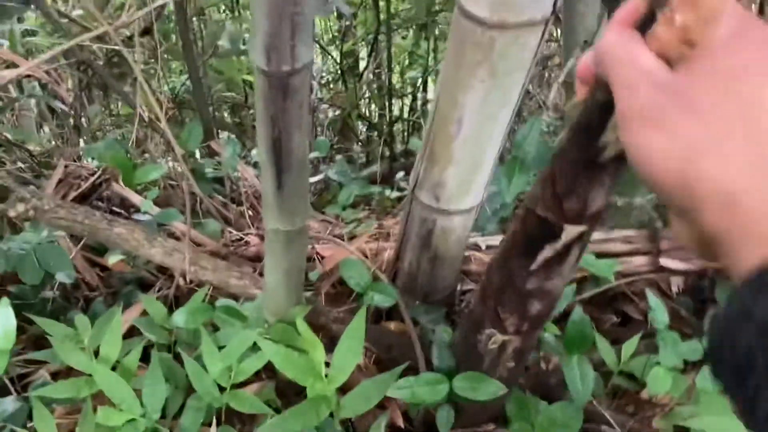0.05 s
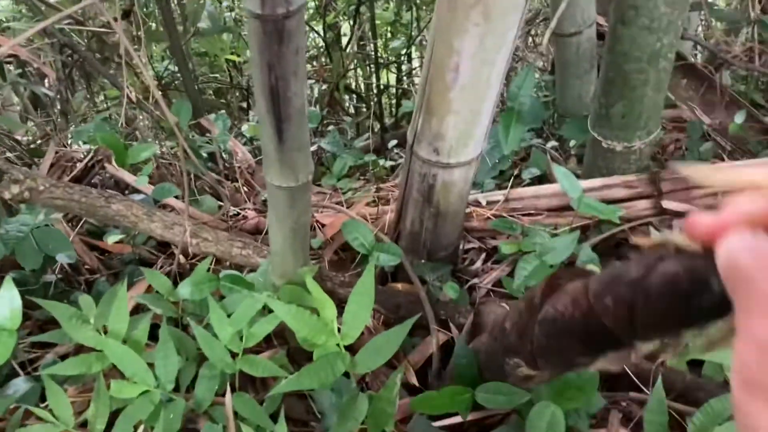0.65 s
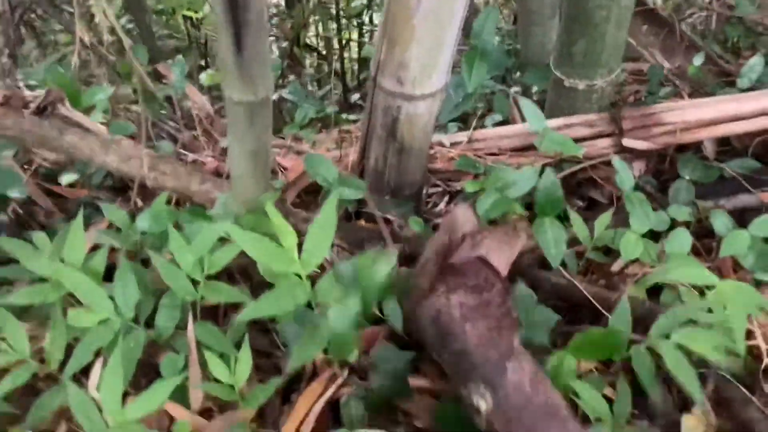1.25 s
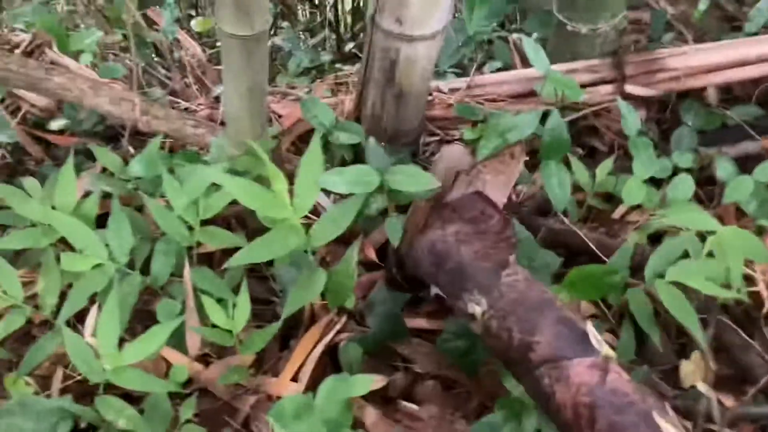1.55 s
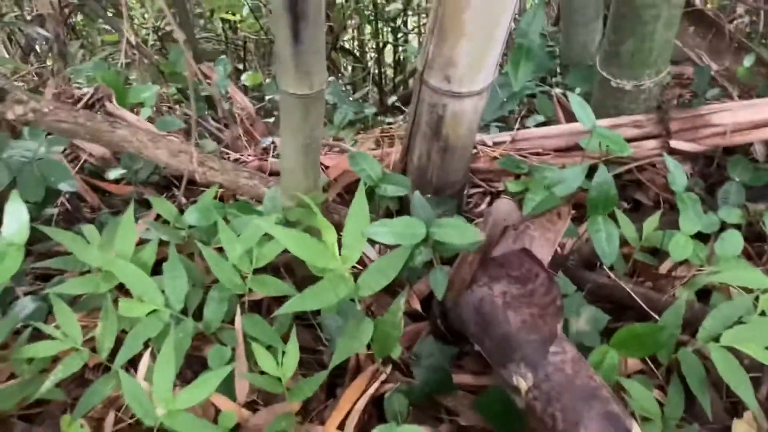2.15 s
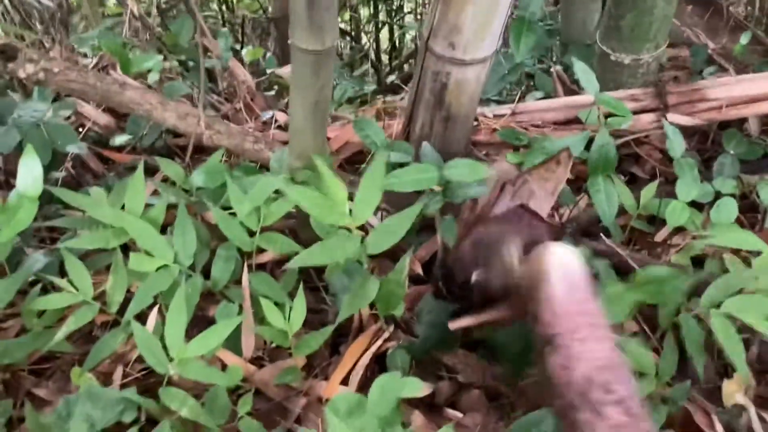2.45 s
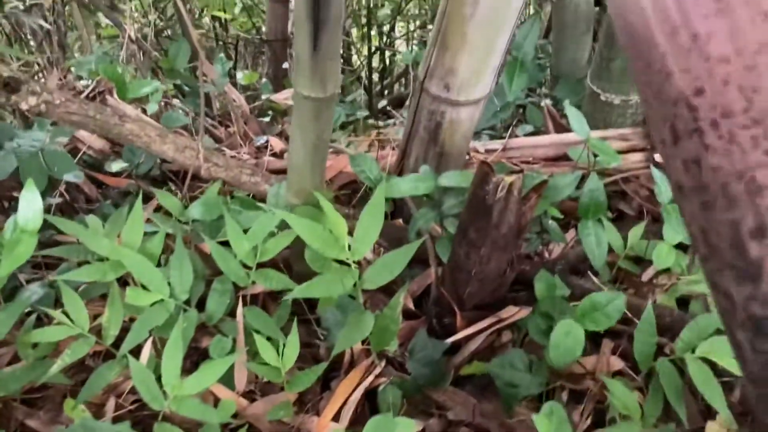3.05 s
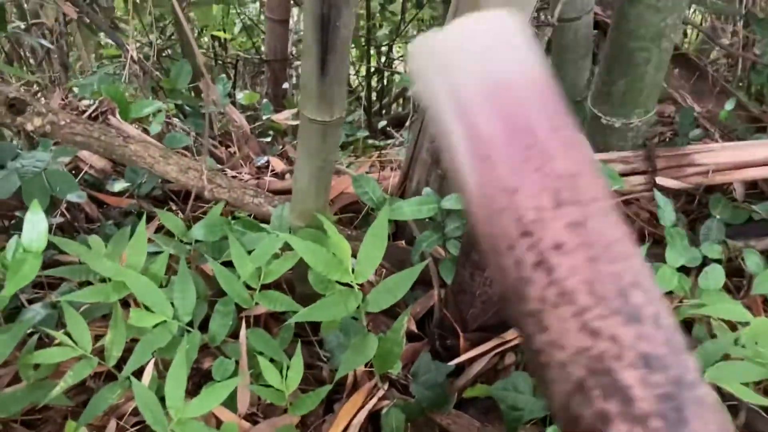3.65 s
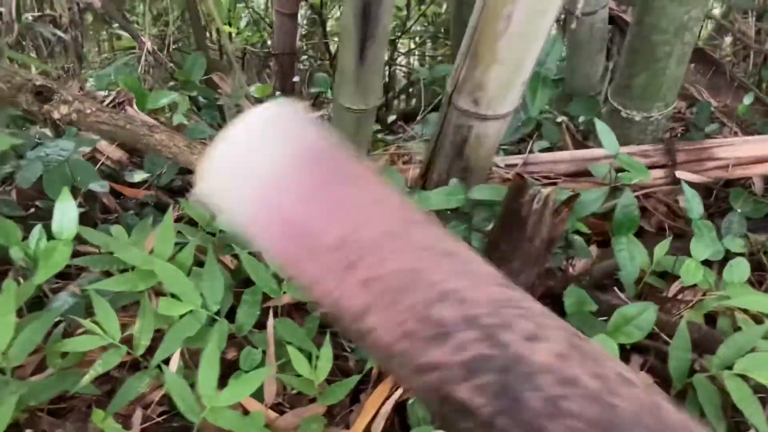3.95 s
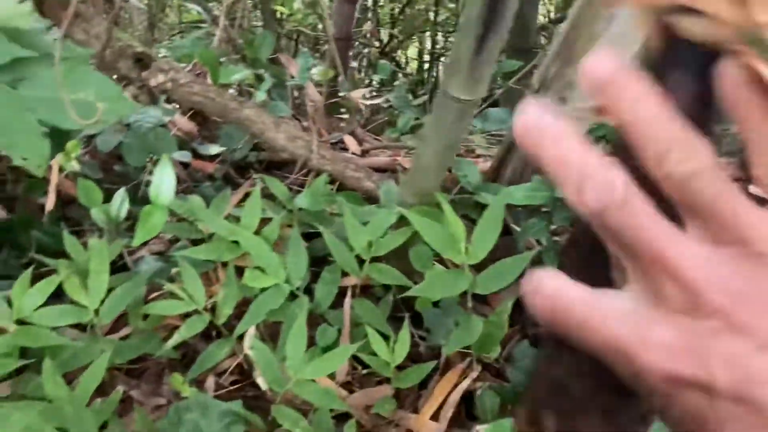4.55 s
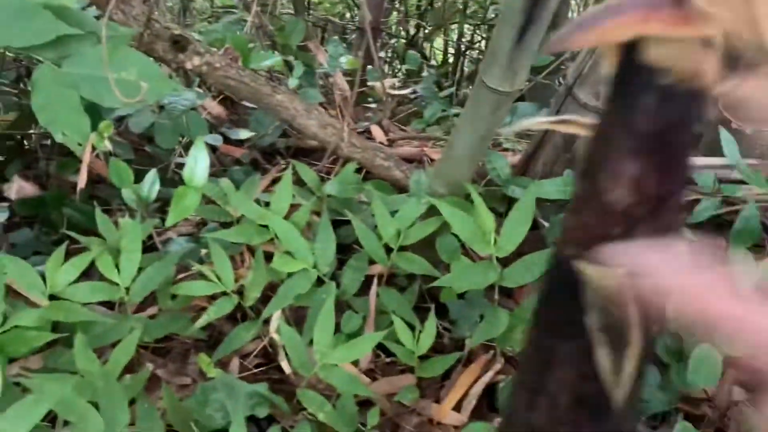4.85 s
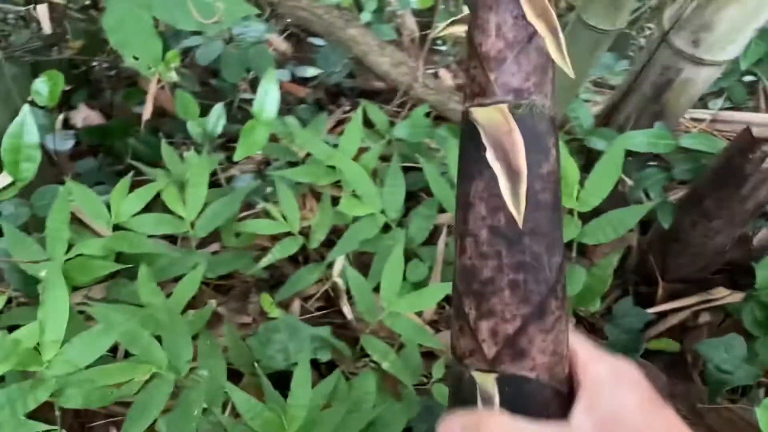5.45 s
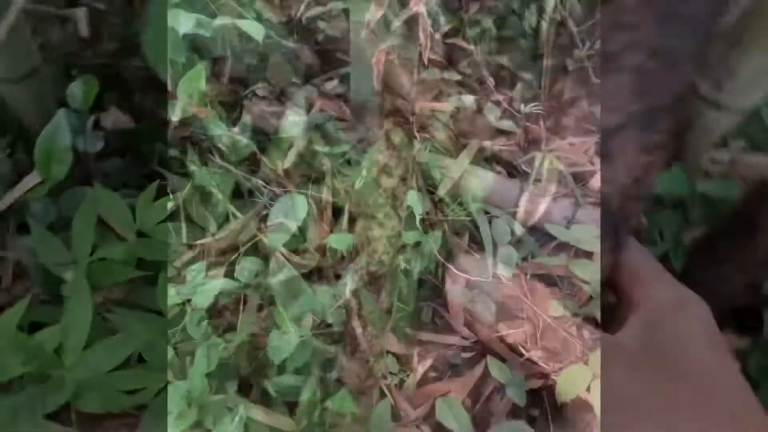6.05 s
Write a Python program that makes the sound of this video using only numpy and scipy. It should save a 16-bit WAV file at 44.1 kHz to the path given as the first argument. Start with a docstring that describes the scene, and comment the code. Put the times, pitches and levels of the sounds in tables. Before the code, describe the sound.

Close to the microphone in a quiet grove, a bamboo shoot is bent over by hand. Its fibres give way in an uneven run of sharp cracks with a few dull thuds. Leaves rustle, then the wet core tears out with a short squeaky rip. Softer brushing and small dry ticks follow as the shoot passes through leaves and hands slide over its husk. Faint foliage hiss and distant traffic lie behind.

```python
"""A bamboo shoot is bent over by hand, close to a stereo microphone in a quiet grove.
Its fibres crack one bundle after another and the rooted stump jolts the soil. The wet core twists,
then tears out of its husk with a stick-slip squeal. The shoot is drawn through low leaves and turned
in the hands, palm and sleeve sliding on the husk. Ground and stems scatter the cracks and the tear;
far traffic hums behind a faint hiss of foliage."""
import sys
import numpy as np
from scipy import signal
from scipy.fft import rfft, irfft, next_fast_len
from scipy.io import wavfile
from scipy.ndimage import uniform_filter1d

SR = 44100
rng = np.random.default_rng(int(sys.argv[2]) if len(sys.argv) > 2 else 0)


def generate_wav(sig):
    """Save sig (samples, or channels by samples) to the path in sys.argv[1] as 16-bit PCM at SR."""
    pcm = np.round(np.clip(np.atleast_2d(sig).T, -1, 1) * 32767).astype(np.int16)
    wavfile.write(sys.argv[1], SR, pcm)


N = 278271
TIME = np.arange(N) / SR
FRAME, HOP = 256, 64  # samples
FRAME_HZ = np.fft.rfftfreq(FRAME, 1 / SR)
FRAME_S = np.arange(-(-N // HOP) + 1) * HOP / SR

# Levels in the tables are relative: colour, grove and microphone act on them afterwards.
# far foliage: frequency_hz, gain_db
FOLIAGE_COLOUR = [(60, 2.5), (400, 4.5), (800, 2), (1500, -2), (4000, -10), (8000, -6.5), (16000, -11.5)]
# far traffic rumble: frequency_hz, gain_db
RUMBLE_COLOUR = [(15, -38.5), (25, 1), (91, 1.5), (184, -1.5), (249, -5), (358, -7.5), (448, -22),
                 (487, -8), (568, -31.5), (700, -26), (910, -47.5), (1540, -120)]
# swell of that rumble: time_s, level_db
RUMBLE_LEVEL = [(0.0, -54), (.9, -57.5), (1.8, -51), (2.35, -62), (3.2, -55), (4.4, -55.5), (5.0, -53.5),
                (6.0, -54)]
# far engine and tyres: time_s, pitch_hz, level_db
ENGINE_HUM = [(3.7, 93.1, -70), (4.05, 96.5, -58), (4.5, 98, -64), (4.85, 106.4, -63), (5.15, 102.2, -56.5),
              (5.4, 101.8, -73), (6.0, 100.6, -78)]
TYRE_WHINE = [(2.8, 496, -83), (3.2, 497, -73), (4.2, 492, -79), (5.3, 483, -75), (5.7, 483, -70),
              (6.0, 497, -67), (6.15, 502, -75), (6.3, 503, -80)]

# swells of hiss, mostly the shoot brushing leaves or fingers; the one at 0.26 s is a short swell of hiss just
# before a loud crack: peak_s, swell_s, fade_s, level_db, tilt_db_per_octave
BRUSH_STROKES = [(.1, 0.19, 0.09, -52, -4.5), (.26, .025, 0.011, -46.5, -5.5), (.86, 0.36, 0.25, -42.5, -3),
                 (1.156, 0.12, .04, -36, -1.2), (1.37, 0.13, 0.027, -39.5, 0.1),
                 (1.46, 0.077, 0.036, -34, 0.7), (1.57, 0.11, 0.077, -35.5, 1),
                 (1.76, 0.14, 0.14, -36.5, 1.5), (1.95, 0.12, 0.088, -41, 1.5),
                 (2.08, 0.11, 0.23, -38, 0.7), (2.455, 0.064, 0.083, -39.5, -4),
                 (2.565, .02, 0.097, -47, -5), (2.74, 0.044, 0.05, -50.5, -1),
                 (2.83, 0.12, .12, -43.5, -1.5), (3.349, 0.083, 0.076, -35, 3),
                 (3.63, 0.086, 0.086, -59.5, 1.5), (4.045, 0.14, 0.24, -47.5, 3),
                 (4.36, 0.081, 0.11, -37.5, 1.8), (4.51, .04, 0.18, -50.5, -0.5),
                 (4.746, 0.024, .019, -41.5, 3), (4.804, .036, 0.011, -39, 4.5),
                 (5.05, 0.065, 0.032, -42.5, -0.5), (5.14, .04, 0.032, -50.5, 0),
                 (5.43, 0.18, 0.064, -45, 2), (5.873, 0.2, 0.075, -50.5, 0.5), (6.027, .022, 0.042, -54, 5)]
# that brushing: frequency_hz, gain_db
BRUSH_COLOUR = [(25, -20.5), (70, 4), (250, -3), (700, -8), (1500, -3.5), (3000, 0.5), (5000, 0), (7500, 2),
                (10500, 2.5), (13000, -6), (16000, -10.5)]
# palm, sleeve and twisting core sliding on the husk: time_s, level_db
PALM_LEVEL = [(5.21, -74), (5.25, -42.5), (5.29, -41), (5.34, -43), (5.44, -46), (5.513, -51), (5.528, -78)]
SLEEVE_LEVEL = [(4.24, -86), (4.33, -56), (4.39, -44), (4.45, -57), (4.53, -81)]
TWIST_LEVEL = [(1.88, -56), (2.0, -51.5), (2.09, -45), (2.125, -52)]
# the husk's resonance under each of them: frequency_hz, gain_db
PALM_RESONANCE = [(100, -22), (1200, -7), (1700, -6), (2200, 0.5), (2700, -6.5), (3300, -10), (4300, -2.5),
                  (6000, -4.5), (16000, -13)]
SLEEVE_RESONANCE = [(100, -32), (600, -9), (1100, 0), (1500, -8), (2200, -11), (4000, -12), (16000, -42)]
TWIST_RESONANCE = [(100, -43), (1300, -19.5), (2000, 0), (2800, -0.5), (3800, -4.5), (8000, -28)]
# the stump jolts the soil, or the shoot is knocked: start_s, pitch_hz, level_db, decay_s
THUDS = [(0.27, 199.7, -14.5, 0.0024), (0.744, 171.4, -16, 0.0052), (1.061, 589.5, -10, 0.0032),
         (1.063, 90, -19.5, 0.013), (1.067, 250, -17, .007), (1.149, 131, -39.5, 0.0088),
         (1.486, 89, -37, 0.0098), (4.967, 516, -35, 0.0038), (4.967, 215, -36.5, 0.0081)]
# the wet core tearing: frequency_hz, gain_db
RIP_COLOUR = [(40, -26.5), (200, -6), (550, 0.5), (1000, -8), (1700, -3.5), (3000, -5), (5500, 1),
              (7500, 1.5), (10500, 1), (13000, -11), (16000, -14.5)]
# its squeaks: start_s, length_s, first_hz, last_hz, level_db, second_harmonic_db, third_harmonic_db
CORE_SQUEAKS = [(2.148, 0.017, 3164, 3210, -14, -17.5, -21.5),
                (2.166, 0.0088, 3650, 3720, -14.5, -4, -23.5),
                (2.172, 0.008, 5000, 5350, -17.5, -19.5, -28.5), (2.175, 0.0077, 3620, 3390, -27, 5.5, -10),
                (2.184, 0.0087, 3505, 3740, -11.5, -6, -10.5),
                (2.191, 0.014, 4196, 4610, -13.5, -13.5, -26.5),
                (2.199, 0.013, 4660, 4960, -17.5, -11, -27.5), (2.204, 0.0069, 1650, 2050, -24, -13, -15),
                (2.208, .017, 2426, 2610, -31.5, -10.5, 12), (2.225, .022, 2532, 2825, -29.5, -11, 5.5),
                (2.246, 0.0092, 4830, 4640, -31, -16, -26), (2.251, 0.014, 5500, 5900, -32, -8.5, -26)]
# a dry leaf or a flap of husk flicks, or the shoot is knocked in the hands: start_s, length_s, level_db,
# tilt_db_per_octave
DRY_TICKS = [(0.228, 0.0058, -41.5, -0.5), (0.529, 0.003, -42.5, -2.5), (0.655, 0.0023, -49, 6),
             (0.927, 0.016, -37.5, -1), (1.453, 0.0016, -39.5, 7), (1.485, 0.0024, -26.5, -4.5),
             (1.697, 0.003, -35.5, 2.9), (1.729, 0.0015, -40.5, 8), (1.765, 0.0066, -31, 6.5),
             (2.018, 0.0085, -42, 8), (2.07, 0.0051, -34.5, 0.5), (2.087, 0.004, -35.5, 1.5),
             (2.432, 0.0044, -27.5, -2.5), (2.448, 0.015, -23, -2.2), (2.456, 0.0073, -25.5, -2.5),
             (2.556, 0.007, -37, -5.5), (2.825, 0.0028, -42, 1), (3.562, 0.0074, -43, 3),
             (4.207, 0.0086, -46, 5), (4.327, 0.006, -43, 6.5), (4.571, 0.005, -40.5, 0.2),
             (4.689, 0.005, -40.5, -0.7), (4.743, 0.0039, -41, 3), (4.801, 0.0073, -42, 8.5),
             (4.966, 0.0096, -29.5, -0.1), (4.993, 0.004, -40, -4), (5.026, 0.0026, -43, -8),
             (5.152, 0.0036, -47.5, 1.5), (5.576, 0.0027, -48, 2.5)]
# a fibre bundle gives way: start_s, length_s, ring_hz, level_db, depth_octaves, tilt_db_per_octave
FIBRE_CRACKS = [(0.041, 0.0019, 2980, -8, 0.2, -7.5), (0.071, 0.0035, 2490.0, -33.5, 2.8, -3.5),
                (0.0907, 0.0042, 1020, -35.5, 4.2, -5), (0.2662, 0.0038, 2530, -8.5, 10, 0.15),
                (0.3117, 0.0036, 2630.0, -26, 0.66, 0), (0.3795, 0.0023, 1540, -8.5, 1.85, -7.5),
                (0.452, 0.0029, 4640, -19, 1.4, 1), (0.505, 0.0029, 2720, -28, 1.3, 0.8),
                (0.5636, 0.0072, 6650.0, -21.5, 1.23, -0.8), (0.6673, 0.0017, 2590.0, -24.5, 1.7, 1.5),
                (0.6735, 0.0051, 2697, -17, 2.4, 2.1), (0.6815, 0.0015, 2696, -18, 2.5, -5.6),
                (0.7111, 0.0032, 3700.0, -18.5, 3, -1.3), (0.7188, 0.0075, 4100, -22.5, 2.4, -2),
                (0.736, 0.0038, 6940.0, -16.5, 1.9, -1.0), (0.7385, 0.0028, 7000, -21, 2.5, 2.1),
                (0.743, 0.0026, 1368, -3, 2.07, -4.5), (0.766, 0.0023, 1240.0, -14, 3.3, -3.5),
                (0.7802, 0.0037, 6940.0, -19, 2.3, -5.5), (0.791, 0.004, 800.0, -15.5, 6, -2),
                (0.8243, 0.003, 1264, -17, 1.7, 0), (0.8351, 0.0034, 1200, -21.5, 1.8, 0.4),
                (0.8386, 0.0018, 4320, -18, 1.6, -1.8), (0.858, 0.0027, 1257, -34.5, 1.9, 1.5),
                (0.8778, 0.0031, 1250, -28.5, 1.5, -5), (0.9456, 0.0041, 3880.0, -9.5, 1.3, -1.5),
                (0.968, 0.0023, 3725, -25, 1.8, 0.5), (0.9765, 0.002, 3620.0, -30, 2.3, 1),
                (0.99, 0.0027, 5480.0, -29, 2, -1.5), (1.027, 0.015, 3190.0, -26, 3.4, -1.5),
                (1.0489, 0.0066, 2110, -19, 5.2, 1.5), (1.0609, 0.0028, 720, -5.5, 2.64, -7.5),
                (1.067, 0.0064, 7205, -15, 6, -2), (1.086, 0.024, 697, -21, 3.5, 0.3),
                (1.1266, 0.0032, 3113, -24.5, 2.6, 1), (1.133, 0.004, 1320, -18, 3.1, -1.2),
                (1.1464, 0.0043, 3910, -17.5, 4.5, 0.8), (2.102, 0.0095, 2006, -27.5, 3.5, 3),
                (2.114, 0.0025, 1872, -12, 4.1, -0.5), (2.138, 0.0022, 7330, -12, 2.1, -0.8),
                (2.1414, 0.0057, 1630, -5, 2.14, -3)]
# cracks and ticks: frequency_hz, gain_db
FIBRE_COLOUR = [(25, -36), (80, -14), (200, 4), (300, 1.5), (400, -3.5), (750, 1.5), (1400, 1.5),
                (2600, -2.5), (4000, 1), (5500, 0), (7500, 1), (10500, 1.5), (13000, -1.5), (16000, -8.5)]

# lag of the microphone's right port, for the shoot and for the low leaves: frequency_hz, lag_rad
SHOOT_LAG = [(0, 0), (500, .2), (1700, -.1), (3200, .5), (4700, -.3), (5700, -4.8), (6500, -6.2),
             (7400, -6.4), (8700, -9.3), (9500, -9.5), (11000, -12.4), (11800, -12.7), (13200, -15.6),
             (14200, -15.8), (15300, -18.8)]
LEAF_LAG = [(0, 0), (500, .4), (1500, -.4), (3000, -3), (5500, -4.1), (6500, -6.2), (7400, -6.4),
            (8700, -9.3), (9500, -9.5), (11000, -12.4), (11800, -12.7), (13200, -15.6), (14200, -15.8),
            (15300, -18.8)]
# how alike the two ports sound: frequency_hz, likeness (0 to 1)
PORT_LIKENESS = [(50, .98), (600, .95), (1500, .82), (2500, .72), (4500, .72), (5400, .5), (6700, .99),
                 (8000, .82), (9100, 1), (10200, .75), (11300, 1), (12500, .75), (13700, 1), (16000, .9)]
# lean to the left: frequency_hz, left_minus_right_db
PORT_BALANCE = [(50, .3), (600, 1.5), (1200, 2.8), (2400, 1.8), (5300, 1.8), (7000, 0), (16000, 0)]


def amp(db):
    """Decibels to amplitude."""
    return 10 ** (np.asarray(db) / 20)


def unit_rms(x):
    """Scales to rms 1."""
    return x / np.sqrt(np.mean(x ** 2) + 1e-20)


def at_hz(points, hz):
    """Joins (frequency_hz, value) points on a log-frequency axis."""
    point_hz, value = np.transpose(points)
    return np.interp(np.log(hz + 1), np.log(point_hz + 1), value)


def octaves(hz, pivot_hz):
    """Distance above a pivot in octaves, levelling off in the bass."""
    return np.log2((hz + 1000) / (pivot_hz + 1000))


def follow(rows):
    """The columns of a table as curves over the whole scene."""
    time_s, *columns = np.transpose(rows)
    return [np.interp(TIME, time_s, column) for column in columns]


def gate(start_s, end_s, edge_s):
    """1 between start and end, with soft edges."""
    return np.clip(np.minimum(TIME - start_s, end_s - TIME) / edge_s, 0, 1)


def add(mix, start_s, sound):
    """Mixes a sound in at its start time."""
    part = mix[..., max(round(start_s * SR), 0):][..., :sound.shape[-1]]
    part += sound[..., :part.shape[-1]]


def wander(rate_hz):
    """A random curve of rms 1 that turns about rate_hz times a second."""
    knots = np.arange(0, N / SR + 1 / rate_hz, 1 / rate_hz)
    return unit_rms(np.interp(TIME, knots, rng.standard_normal(N)[:len(knots)]))


def coloured(x, colour):
    """Filters by a (frequency_hz, gain_db) spectrum."""
    size = next_fast_len(N)
    gain = amp(at_hz(colour, np.fft.rfftfreq(size, 1 / SR)))
    return irfft(rfft(x, size) * gain, size)[..., :N]


def noise(colour):
    """Two unrelated coloured noises of rms 1."""
    return unit_rms(coloured(rng.standard_normal((2, N)), colour))


def foliage(level_db=-61.5):
    """The steady hiss of far foliage."""
    return amp(level_db) * noise(FOLIAGE_COLOUR)


def drone(rows, width_hz):
    """A far tone, blurred by its many paths through the trees."""
    hz, db = follow(rows)
    carrier = np.exp(2j * np.pi * np.cumsum(hz) / SR)
    blur = wander(width_hz) + 1j * wander(width_hz)
    return (carrier * blur).real * amp(db) * gate(rows[0][0], rows[-1][0], edge_s=.1)


def traffic(trim_db=-4.0):
    """Far from the grove: a low rumble with a wavering engine note and a faint tyre whine."""
    out = noise(RUMBLE_COLOUR) * amp(follow(RUMBLE_LEVEL)[0] + trim_db)
    out[0] += drone(ENGINE_HUM, width_hz=24) + drone(TYRE_WHINE, width_hz=18)
    return out


def grove(x, near_db=-16.5, near_t60_s=0.069, far_db=-26, far_t60_s=0.21):
    """Ground and leaves scatter the sound at once; the standing stems return a faint longer tail."""
    t = np.arange(SR // 2) / SR
    near, far = rng.standard_normal((2, 2, len(t))) * (rng.random((2, 2, len(t))) < .15)
    near = near * (t > .003) * amp(-60 * t / near_t60_s)
    far = far * (t > .015) * amp(-60 * t / far_t60_s)
    tail = amp(near_db) * near / np.linalg.norm(near[0]) + amp(far_db) * far / np.linalg.norm(far[0])
    echoes = signal.fftconvolve(x, tail, axes=1)[:, :N]
    return coloured(echoes, [(100, -9), (500, -4.5), (1500, -1), (6000, 3.0), (14000, 4.0)])


def friction(gain, colour, grain_db, grains_per_s, smooth_share, flicker_db, slip_s=.0007):
    """Countless uneven slips over a smooth hiss, shaped by a gain (frequencies x frames)."""
    sizes = amp(grain_db * np.minimum(rng.exponential(1, N), 3.4))
    sizes *= rng.random(N) < grains_per_s / SR
    slips = signal.lfilter([1], [1, -np.exp(-1 / (slip_s * SR))], sizes ** 2)
    power = smooth_share + (1 - smooth_share) * slips / slips.mean()
    hiss = rng.standard_normal((2, N)) * np.sqrt(power) * amp(flicker_db * wander(70))
    frames = signal.stft(unit_rms(hiss), SR, nperseg=FRAME, noverlap=FRAME - HOP)[2]
    frames *= gain * amp(at_hz(colour, FRAME_HZ))[:, None]
    return signal.istft(frames, SR, nperseg=FRAME, noverlap=FRAME - HOP)[1][:, :N]


def brushing(shiver_db=-33, shiver_swell_s=0.0037, shiver_fade_s=0.032, shiver_db_per_octave=-4):
    """Swells of hiss, mostly the shoot brushing leaves or fingers; each crack adds a shiver in proportion to
    its strength."""
    shivers = [(s + shiver_swell_s, shiver_swell_s, shiver_fade_s, db + shiver_db, shiver_db_per_octave)
               for s, _, _, db, _, _ in FIBRE_CRACKS]
    peak_s, swell_s, fade_s, db, tilt = np.transpose(list(BRUSH_STROKES) + shivers)[:, :, None]
    t = FRAME_S - peak_s
    envelopes = np.exp(-abs(t / np.where(t < 0, swell_s, fade_s)) ** 1.5)  # between pointed and round
    spectra = amp(db + tilt * octaves(FRAME_HZ, 6000))
    gain = np.sqrt(spectra.T ** 2 @ envelopes ** 2)
    return friction(gain, BRUSH_COLOUR, grain_db=4.4, grains_per_s=380, smooth_share=.48, flicker_db=1.1)


def slide(rows, resonance, flicker_db=1.0):
    """Skin or cloth slides along the hollow husk, which lends it a resonance."""
    hiss = noise(resonance)
    level_db = follow(rows)[0] + flicker_db * wander(60)
    return hiss * amp(level_db) * gate(rows[0][0], rows[-1][0], edge_s=0.011)


def thuds(rise_s=0.00063):
    """Jolts of the stump in the soil and knocks on the shoot: dull pushes that die in a few cycles."""
    t = np.arange(SR // 8) / SR
    out = np.zeros((2, N))
    for start_s, hz, db, decay_s in THUDS:
        envelope = np.exp(-t / decay_s) * (1 - np.exp(-t / rise_s))
        add(out[0], start_s, amp(db) * np.sin(2 * np.pi * hz * t) * envelope)
    return out


def squeak(length_s, first_hz, last_hz, db, second_db, third_db, jitter=.028, shimmer_db=3.6):
    """Wet skin sticks and slips on the husk, unevenly, gliding in pitch as the core changes speed."""
    t = np.arange(0, length_s, 1 / SR)
    glide_hz = first_hz + (last_hz - first_hz) * t / length_s
    hz = glide_hz * (1 + jitter * wander(1500)[:len(t)])
    phase = 2 * np.pi * np.cumsum(hz) / SR
    tone = np.sin(phase) + amp(second_db) * np.sin(2 * phase) + amp(third_db) * np.sin(3 * phase)
    edges = np.clip(np.minimum(t, length_s - t) / 0.0016, 0, 1)
    grip = unit_rms(amp(shimmer_db * wander(1300)[:len(t)]))
    return np.sqrt(2) * amp(db) * edges * grip * tone


def core_tear(start_s=2.141, end_s=2.272, edge_s=0.015, level_db=-12.5, low_cut_hz=480):
    """The core comes free: a wet, squeaking rip that thins and brightens as it slides out."""
    fade_db_per_s, tilt_db_per_octave_per_s = 235, 52.5
    age_s = np.clip(FRAME_S - start_s - edge_s, 0, end_s - start_s)
    tilt_db = tilt_db_per_octave_per_s * age_s * octaves(FRAME_HZ, 6000)[:, None]
    gain = amp(level_db - fade_db_per_s * age_s + tilt_db)
    gain /= np.hypot(1, low_cut_hz / (FRAME_HZ + 1))[:, None]
    rip = friction(gain, RIP_COLOUR, grain_db=2.5, grains_per_s=2200, smooth_share=0.2, flicker_db=1.5)
    rip *= gate(start_s, end_s, edge_s)
    for squeak_s, *shape in CORE_SQUEAKS:
        add(rip[0], squeak_s, squeak(*shape))
    return rip


def crack(length_s, ring_hz, db, depth_octaves, tilt, rise_s=0.000086, ring_gain=1.25, ring_q=6.5):
    """A bundle of fibres fails in a rush of tiny snaps; thick bundles reach deeper."""
    size, pivot_hz, top_hz, trim_db = 4096, 2000, 8050, -0.62
    t, hz = np.arange(size) / SR, np.fft.rfftfreq(size, 1 / SR)
    snaps = rng.standard_normal((2, size)) * np.exp(.8 * rng.standard_normal((2, size)))
    envelope = (1 - np.exp(-t / rise_s)) * np.exp(-(t / length_s) ** 1.3)
    spectrum = rfft(snaps * envelope)
    spectrum /= np.sqrt(uniform_filter1d(abs(spectrum) ** 2, size=70, axis=1) + 1e-12)  # flatten
    spectrum *= amp(db + tilt * octaves(hz, pivot_hz) + at_hz(FIBRE_COLOUR, hz) + trim_db)
    bottom_hz = pivot_hz / 2 ** depth_octaves
    spectrum /= np.hypot(1, (bottom_hz / (hz + 1)) ** 2.2) * np.hypot(1, hz / top_hz)
    detuning = hz / ring_hz - ring_hz / (hz + 1)
    spectrum *= 1 + ring_gain / (1 + 1j * ring_q * detuning)  # the freed splinter rings briefly
    spectrum *= np.exp(-2j * np.pi * 0.6994 * np.log(hz + 160))  # the stem passes low notes on later
    return irfft(spectrum) * np.sqrt(.005 * SR)


def fibres():
    """Right at the microphone: the cracks of the stem and the lighter ticks of husk and dry litter, with knocks
    from the hands."""
    out = np.zeros((2, N))
    for start_s, *bundle in FIBRE_CRACKS:
        add(out, start_s, crack(*bundle))
    for start_s, length_s, db, tilt in DRY_TICKS:
        add(out, start_s, crack(length_s, ring_hz=7760, db=db, depth_octaves=1.6, tilt=tilt))
    return out


def microphone_ports(pair, lag):
    """Two unrelated signals become left and right: mostly alike, the right earlier in the treble."""
    size = next_fast_len(N)
    hz = np.fft.rfftfreq(size, 1 / SR)
    shared, separate = rfft(pair, size)
    likeness = at_hz(PORT_LIKENESS, hz)
    lean = amp(at_hz(PORT_BALANCE, hz) / 2)
    right = (likeness * shared + np.sqrt(1 - likeness ** 2) * separate) * np.exp(-1j * at_hz(lag, hz))
    return irfft([shared * lean, right / lean], size)[:, :N]


def scene():
    """Shoot, hands and low leaves close to the microphone, with the grove and far traffic behind."""
    rustle = brushing()
    lifted = np.clip((TIME - 3.6) / 0.43, 0, 1)  # the shoot rises out of the leaves into the hands
    shoot = fibres() + thuds() + core_tear()
    hands = slide(TWIST_LEVEL, TWIST_RESONANCE) + slide(PALM_LEVEL, PALM_RESONANCE)
    hands += slide(SLEEVE_LEVEL, SLEEVE_RESONANCE) + rustle * np.sqrt(lifted)
    low_leaves = rustle * np.sqrt(1 - lifted)
    mix = shoot + grove(shoot) + hands + traffic() + foliage()
    return microphone_ports(mix, SHOOT_LAG) + microphone_ports(low_leaves, LEAF_LAG)


def record(dry, low_cut_hz=42, ceiling=.82, fade_start_s=6.033, fade_db_per_s=29, top_hz=16000):
    """The microphone drops deep rumble, rounds the loudest peaks and cuts the top; the end fades."""
    low_cut = signal.butter(3, low_cut_hz, "highpass", fs=SR, output="sos")
    thinned = signal.sosfilt(low_cut, dry)
    rounded = thinned / (1 + (abs(thinned) / ceiling) ** 6) ** (1 / 6)
    faded = rounded * amp(-fade_db_per_s * np.maximum(TIME - fade_start_s, 0))
    high_cut = signal.firwin(255, top_hz, window=("kaiser", 9), fs=SR)
    return signal.oaconvolve(faded, high_cut[None], "same")


dry = scene()
out = record(dry)
generate_wav(out)
```